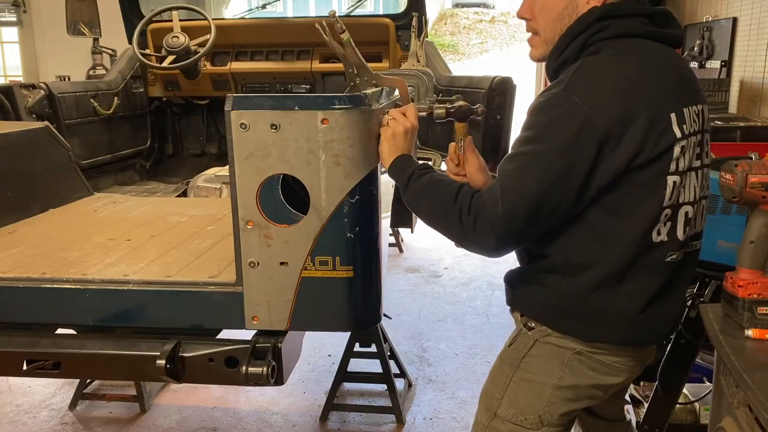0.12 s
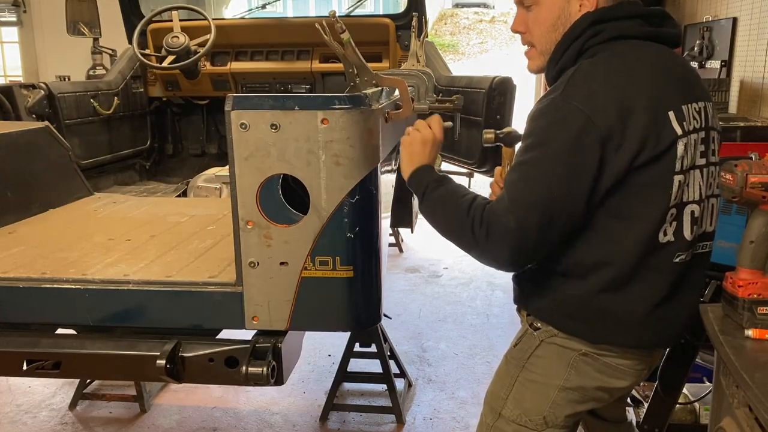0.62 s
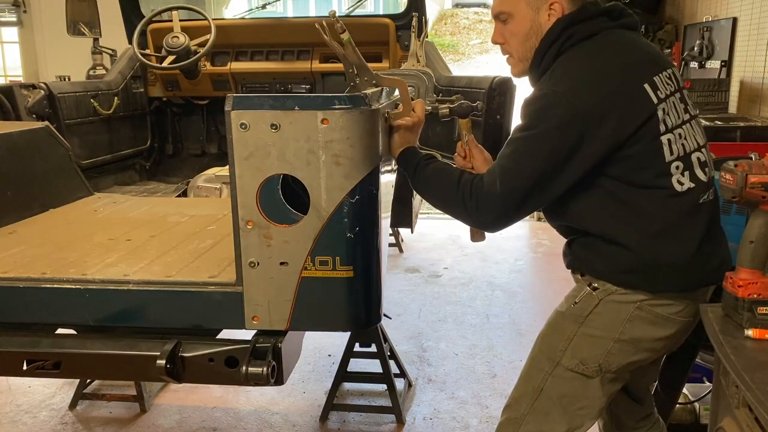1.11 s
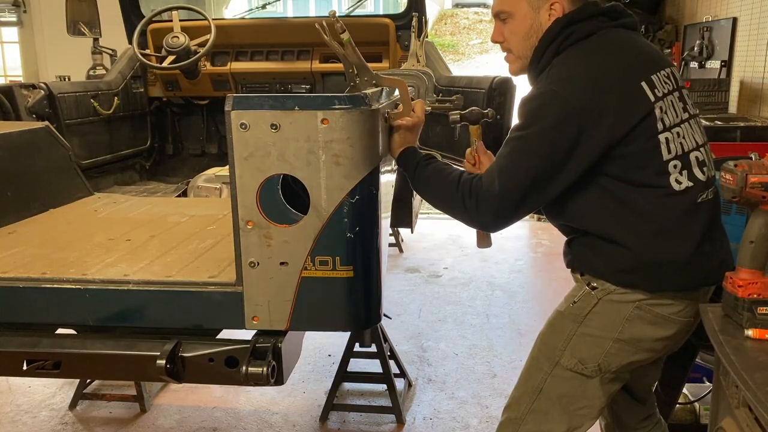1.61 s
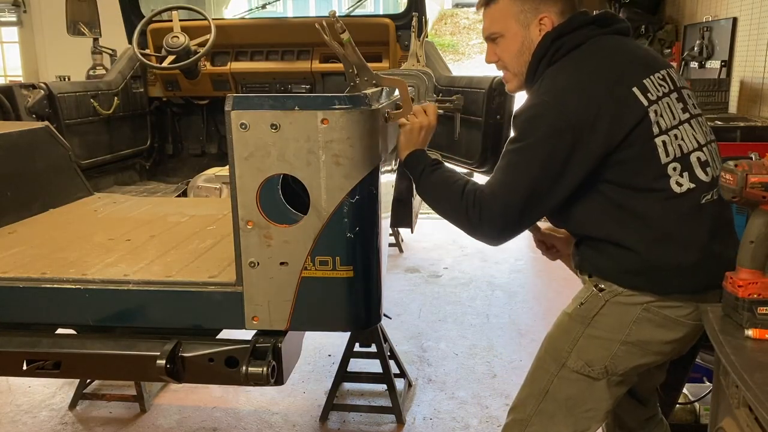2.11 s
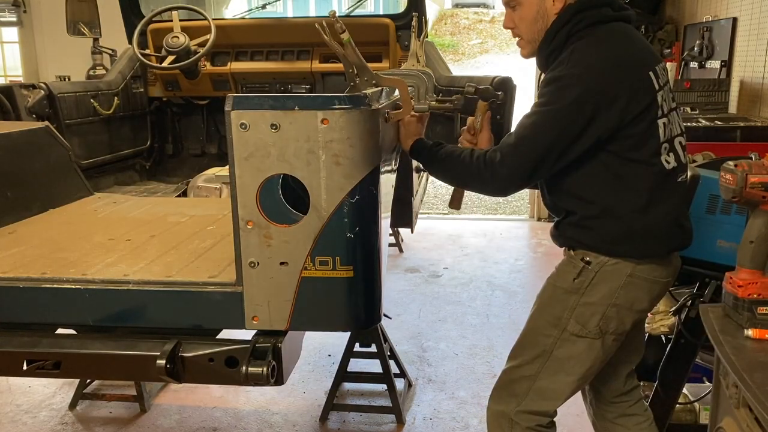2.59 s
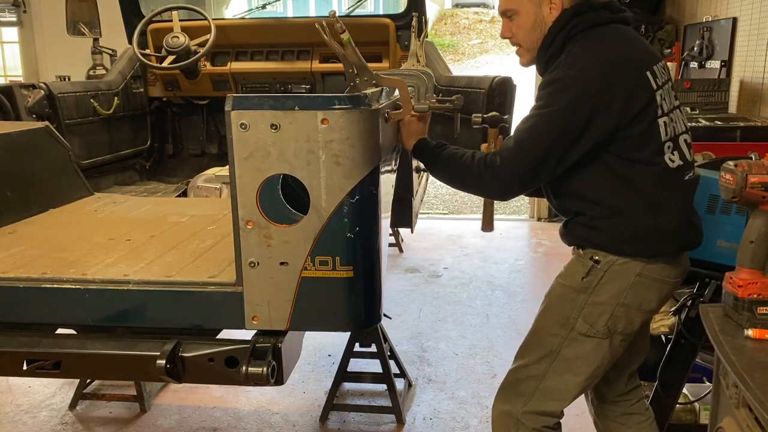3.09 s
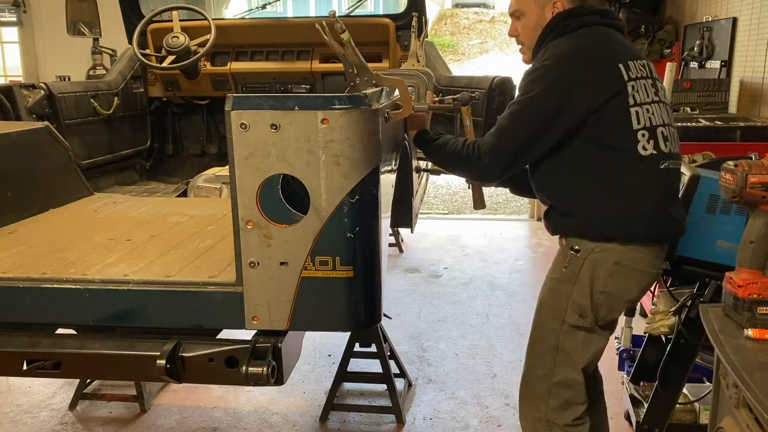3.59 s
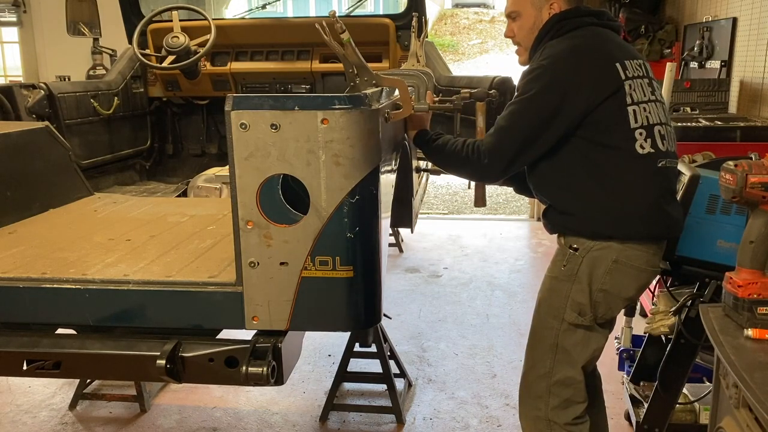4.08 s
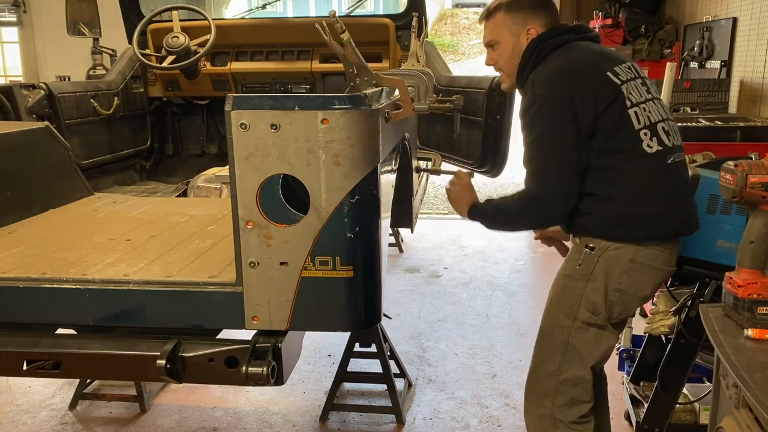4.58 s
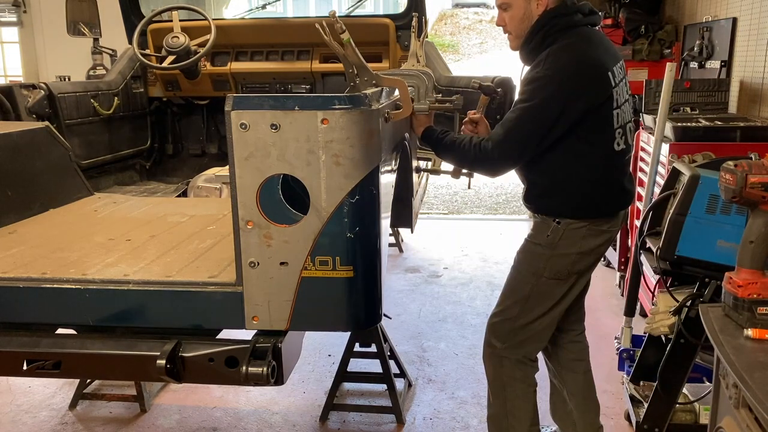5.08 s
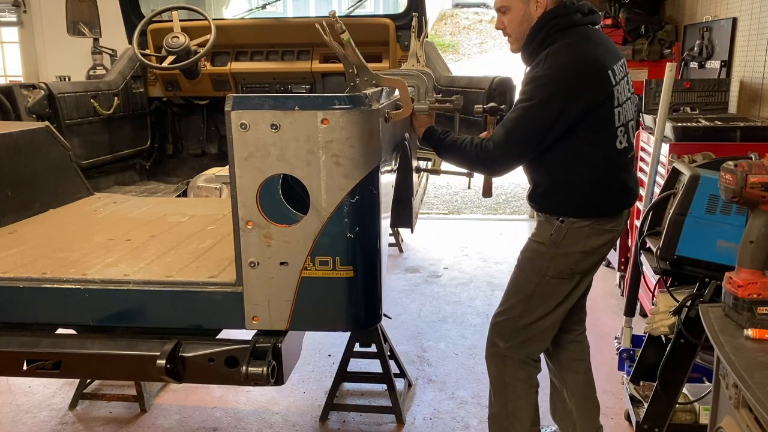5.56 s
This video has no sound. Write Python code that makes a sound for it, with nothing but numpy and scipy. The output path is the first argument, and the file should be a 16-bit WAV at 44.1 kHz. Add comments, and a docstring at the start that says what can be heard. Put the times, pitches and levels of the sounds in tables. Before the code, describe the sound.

In a hard-walled workshop, single sharp hammer strikes on sheet steel boom and clang five times, with faint metal ticks and cloth rustle between.

```python
"""Hammer and centre punch on a steel panel

Five blows in a hard-walled garage: noise-burst cracks, damped panel modes, fluttering punch lines and a
long wash of shaped noise. Jump cuts end each ring and step the background: traffic rumble, hush, scuffing
clothes as coloured noise, while the punch ticks on the steel. Two close microphone ports, gain control.
"""
import sys
import numpy as np
from scipy import signal
from scipy.fft import rfft, irfft, next_fast_len
from scipy.io import wavfile
from scipy.ndimage import uniform_filter1d, minimum_filter1d

SR = 44100
rng = np.random.default_rng(int(sys.argv[2]) if len(sys.argv) > 2 else 0)


def boost(x):
    """Linear amplitude factor 10**(x/20) for a level x in decibels (scalar or array-like)."""
    u = np.asarray(x, float) / 20
    return 10 ** u


def master_out(mix):
    """Clip the mix to full scale and print it as 16-bit PCM to the path in sys.argv[1]."""
    frames = np.transpose(np.atleast_2d(mix))
    ceiling = np.clip(frames, -1, 1)
    pcm = np.round(ceiling * 32767).astype(np.int16)
    wavfile.write(sys.argv[1], SR, pcm)


N = 250929

# Jump cuts: cut_s
CUT_TIMES_S = [.922, 2.24, 3.539, 4.81]
# Steady background between cuts: rumble_db, hush_db, scuff_db
SHOT_LEVELS = [(-49, -62.5, -79.5), (-52.5, -61, -75.5), (-50, -61, -67), (-53.5, -56.5, -67.5),
               (-55.5, -59.5, -76.5)]
# Body movements: peak_s, rise_db_per_s, fall_db_per_s, scuff_db, low_rustle_db
MOVEMENTS = [(.86, 41.5, 12.5, -56.5, -54), (2.78, 34.5, 30, -63.5, -60.5), (3.56, 100, 30, -52.5, -59),
             (4.77, 30, 17.5, -61.5, -58.5), (5.25, 71, 29.5, -63, -69.5)]
MOVE_RUMBLE_DB = 12.5  # over the low rustle
# Spectrum shape of the traffic rumble: freq_hz, relative_db_per_hz
RUMBLE_SPECTRUM = [(15, -53.5), (25, -42), (48, -1.5), (102, 0.5), (220, -9.5), (275, -15), (350, -14.5),
                   (460, -21), (770, -120)]
# Spectrum shape of the garage hush: freq_hz, relative_db_per_hz
HUSH_SPECTRUM = [(180, -26), (300, -8), (450, -6.5), (1200, -13.5), (2900, -22), (5000, -39.5),
                 (9000, -71.5), (20000, -120)]
# Spectrum shape of scuffing cloth: freq_hz, relative_db_per_hz
SCUFF_SPECTRUM = [(760, -33), (1300, -4), (1850, -5), (2300, 1), (3000, -8.5), (3890, -7), (7060, -19),
                  (12000, -35.5), (15600, -62), (22000, -120)]

# Punch tip touching the steel: start_s, level_db, ring_over_puff_db
TIP_TOUCHES = [(0.634, -48.5, -16), (0.7735, -51, -14), (1.3103, -67, -19), (1.8436, -44, -12),
               (2.0, -62, -9), (2.1053, -62, -8), (2.1468, -62, -6.5), (2.3236, -62.5, -17),
               (2.455, -60, -18), (4.3909, -40, -21)]
# Colour of the puff: freq_hz, gain_db
PUFF_COLOUR = [(1500, -16.0), (5000, 3.5), (10500, -2.5), (14000, -20.0)]
# Answer of the touched punch, strongest in two modes: freq_hz, gain_db
TOUCH_ANSWER = [(4400, -5.5), (5200, 8.5), (6000, 0.5), (9900, -6), (10400, 6.5), (12000, -8)]
# Low tones still sounding after the third cut: pitch_hz, level_db, t60_s
LINGERING_TONES = [(136.3, -39.5, 0.473), (172, -50.5, .8), (238, -51, 2.8)]

# Blows: start_s, level_db, boom_db, knock_db, clang_db, spot_along_panel (-1..1)
HAMMER_BLOWS = [(0.178, -1.5, -2, -1, -0.5, -0.78), (1.489, -0.5, -1, 4.5, -4.5, 0.35),
                (2.797, -0.5, -0.5, 1.5, -3.5, -0.44), (4.004, -2, 0, 6, 0, 0.8),
                (5.269, 0.5, 1, -0.5, -1.5, .15)]
TREBLE_DB = -5.3  # punch ring and wash top end in every blow
# Rebounds in each blow: first_s, first_level_db, gap_s, change_db_per_rebound
REBOUNDS = [(0.1773, -0.5, 0.0047, -3.7), (1.4884, 0, 0.0044, 0.7), (2.797, -1, .0021, -1.7),
            (4.0051, -1.5, .0037, 1), (5.2691, -4, .0031, -2.8)]
# Contacts in each blow: count
CONTACT_COUNTS = [4, 2, 3, 2, 4]
# Punch and hammer head modes: pitch_hz, level_db, t60_s
PUNCH_MODES = [(3170, -13, 0.9), (4250, -10.5, 0.12), (5100, -5.5, 0.77), (6070, -1.5, 0.59),
               (6920, -4.5, 0.72), (8760, 11, 0.089), (9750, -1.5, 0.33), (10450, -5.5, 0.45),
               (14900, -7.5, .15), (15670, -1.5, 0.21)]
# Panel modes: pitch_hz, t60_s, mid_panel_db, gain_from_mid_to_far_end_db
PANEL_MODES = [(67.2, 1.3, -23, -1), (122.1, 0.99, -15, 0.6), (154.8, 0.96, -21, 8),
               (187.06, 0.44, -4.5, 0.7), (216.6, 1.1, -16, 5.5), (262.3, 0.99, -17.5, -5.5),
               (341.7, 0.76, -14.5, 0.3), (375.3, 0.56, -14.5, 4), (542, 1.3, -35, 4),
               (700, 0.46, -20.5, 15)]
# Wash spectrum before each blow's tilt: freq_hz, level_db_per_hz
WASH_SPECTRUM = [(24, -55.5), (40, -16), (120, -6.5), (200, -3.5), (370, -6.5), (900, -14.5), (2200, -15),
                 (5000, -18.5), (10000, -17), (13000, -23), (14600, -28.5), (15700, -31), (16800, -76)]
# Nominal decay of the wash: freq_hz, t60_s
GARAGE_DECAY = [(60, 1.58), (160, 1.013), (420, 0.63), (1100, 0.73), (2900, 0.69), (5500, 0.59),
                (9000, 0.41), (15000, 0.37)]
# Rise of the wash: freq_hz, time_constant_s
WASH_RISE = [(60, .08), (130, .035), (200, 0.024), (400, 0.012), (600, 0.0065), (3000, 0.011)]
# First arrivals over the tail: freq_hz, level_db
EARLY_ARRIVALS = [(300, -13), (1500, -2.5), (5000, -4), (15000, 5.5)]

# Likeness of the two ports: freq_hz, correlation
PORT_LIKENESS = [(60, 0.87), (300, 0.91), (500, 0.21), (3000, 0.59), (5500, 0.15), (7000, 0.32),
                 (16000, 0.96)]
# Phase by which the left port leads: freq_hz, lead_rad
PORT_LEAD = [(0, 0), (780, .9), (5250, 1.1), (6890, 0), (8300, -3.3), (10300, -6.1), (11700, -6.4),
             (12800, -9.3), (14300, -9.6), (15200, -12.5), (16500, -12.7)]
# Level of the left port over the right: freq_hz, left_minus_right_db
PORT_LEAN = [(60, -4), (110, -2.5), (200, -4.5), (380, -1.5), (700, 1), (1290, 0.5), (2380, 1), (4400, 4),
             (8120, -1), (15000, -3)]
# Microphone top end: freq_hz, gain_db
MIC_TOP = [(15900, 0), (17300, -50)]


def unit(x):
    """Scale to rms 1."""
    return x / np.sqrt(np.mean(x ** 2) + 1e-20)


def along(points, hz):
    """Interpolate (Hz, value) points on a log frequency axis."""
    f, v = np.transpose(points)
    return np.interp(np.log(hz + 1), np.log(f + 1), v)


def filtered(x, response):
    """Multiply the spectrum of x by a complex response of frequency."""
    n = x.shape[-1]
    m = next_fast_len(n + 8192)
    return irfft(rfft(x, m) * response(np.fft.rfftfreq(m, 1 / SR)), m)[..., :n]


def coloured(spectrum):
    """Two unrelated noises of this spectrum, scaled together to rms 1."""
    return unit(filtered(rng.standard_normal((2, N)), lambda hz: boost(along(spectrum, hz))))


def place(track, s, sound):
    """Add the sound from s until the next jump cut."""
    start = round(s * SR)
    later_cuts = [round(c * SR) for c in CUT_TIMES_S if c > s]
    stop = min(later_cuts + [N, start + sound.shape[1]])
    return track + np.pad(sound[:, :stop - start], ((0, 0), (start, N - stop)))


def background():
    """Traffic rumble, garage hush and cloth noise: steady between cuts, powers added by each movement."""
    t = np.arange(N) / SR
    shot = np.searchsorted(CUT_TIMES_S, t)
    power = boost(np.transpose(SHOT_LEVELS)[:, shot]) ** 2
    for s, rise_db_per_s, fall_db_per_s, scuff_db, low_db in MOVEMENTS:
        swell_db = np.where(t < s, rise_db_per_s * (t - s), fall_db_per_s * (s - t))
        swell = boost(swell_db) * (shot == np.searchsorted(CUT_TIMES_S, s))  # confined by the cuts
        levels = boost([low_db + MOVE_RUMBLE_DB, low_db, scuff_db])
        power = power + np.outer(levels, swell) ** 2
    layers = coloured(RUMBLE_SPECTRUM), coloured(HUSH_SPECTRUM), coloured(SCUFF_SPECTRUM)
    return sum(np.sqrt(p) * layer for p, layer in zip(power, layers))


def punch(t):
    """Punch modes at new strengths each time; gripping hand and walls make each line flutter."""
    hz, db, t60 = np.transpose(PUNCH_MODES)[:, :, None]
    db = db + 2.5 * rng.standard_normal(db.shape)
    a, b = uniform_filter1d(rng.standard_normal((2, len(hz), len(t))), size=300)
    lines = unit(a * np.sin(2 * np.pi * hz * t) + b * np.cos(2 * np.pi * hz * t))
    return np.sum(boost(db - 60 * t / t60) * lines, axis=0)


def ticks():
    """Light touches: a short bright noise puff with a slower tail, and a faint punch ring."""
    track, t = np.zeros((2, N)), np.arange(SR // 2) / SR
    puff_decay = boost(-4.5 - 60 * t / 0.016) + boost(-12.5 - 60 * t / 0.33)
    for s, db, ring_db in TIP_TOUCHES:
        noise = rng.standard_normal((2, len(t)))
        puff = filtered(noise, lambda hz: 3.4 * boost(along(PUFF_COLOUR, hz))) * puff_decay
        hum = filtered(punch(t), lambda hz: boost(along(TOUCH_ANSWER, hz)))
        track = place(track, s, boost(db - 9) * (puff + boost(ring_db) * hum))
    return track


def ring(hz, db, t60, t, attack_s, blur_hz):
    """Damped modes; each is a close pair that beats, so no ring is glassy."""
    hz, db, t60 = (np.asarray(v)[:, None] for v in (hz, db, t60))
    split, phase, other = rng.random((3, len(hz), 1))
    pair = np.sin(2 * np.pi * (hz * t + phase))
    pair = pair + 0.57 * np.sin(2 * np.pi * ((hz + blur_hz * (.5 + split)) * t + other))
    return np.sum(boost(db - 60 * t / t60) * pair, axis=0) * (1 - np.exp(-t / attack_s))


def lingering():
    """Low damped tones that sound on after the third cut."""
    t = np.arange(SR // 2) / SR
    tones = ring(*np.transpose(LINGERING_TONES), t, attack_s=0.0078, blur_hz=4.2)
    return place(np.zeros((2, N)), CUT_TIMES_S[2], np.array([[1], [.6]]) * tones)


def wash(boom_db, knock_db, clang_db, treble_db):
    """Countless close panel modes and walls: noise that swells and dies at its own speed per frequency."""
    lead = 256  # samples ahead of the blow
    peaks = unit(uniform_filter1d(rng.standard_normal(SR), size=24))  # chance strengths of crowded modes
    noise = filtered(rng.standard_normal((2, SR + lead)), lambda f: boost(2.8 * peaks[f.astype(int)]))
    hz, t, z = signal.stft(unit(noise), SR, nperseg=256, noverlap=224)
    t = np.maximum(t - lead / SR, 0)
    early = boost(along(EARLY_ARRIVALS, hz)[:, None] - 60 * t / 0.13)
    t60 = along(GARAGE_DECAY, hz) * np.exp(.05 * rng.standard_normal(len(hz)))  # some modes outlast others
    beats = uniform_filter1d(rng.standard_normal(z.shape[1:]), size=3, axis=0)
    beats_db = 20 * np.log10(boost(1)) * unit(uniform_filter1d(beats, size=40))  # neighbours beat in patches
    shape = (boost(-60 * t / t60[:, None]) + early) * boost(beats_db)
    shape = shape * (1 - np.exp(-t / along(WASH_RISE, hz)[:, None]))
    tail = signal.istft(z * shape, SR, nperseg=256, noverlap=224)[1][:, :SR + lead]
    tilt = [(200, boom_db), (520, knock_db), (1500, 0.0058), (2800, 0), (5000, clang_db), (10000, treble_db)]
    tail = filtered(tail, lambda f: boost(along(WASH_SPECTRUM, f) + along(tilt, f)))[:, lead:]
    return tail * np.clip(np.arange(SR) / (0.0017 * SR), 0, 1)


def cracks():
    """Millisecond snaps of steel on steel as hammer, punch and panel meet and rebound: band-passed noise."""
    track, t = np.zeros((2, N)), np.arange(SR // 20) / SR
    centre_hz, width_hz = 3300, 5000
    band = lambda f: 1j * f * width_hz / (centre_hz ** 2 - f * f + 1j * f * width_hz)
    for (s, db, gap_s, change_db), count in zip(REBOUNDS, CONTACT_COUNTS):
        for k in range(count):
            snap = filtered(boost(-60 * t / .005) * rng.standard_normal(len(t)), band)
            sound = np.outer([1.3, .6], snap / np.abs(snap).max())
            track = place(track, s + k * gap_s, boost(db + k * change_db) * sound)
    return track


def hammer():
    """Punch ring, panel boom and wash of each blow; row 0 common to both ports, row 1 diffuse."""
    track, t = np.zeros((2, N)), np.arange(SR) / SR
    direct = np.array([[1], [.6]])
    hz, t60, mid_db, gained_db = np.transpose(PANEL_MODES)
    for s, db, boom_db, knock_db, clang_db, spot in HAMMER_BLOWS:
        steel = boost(-24 + TREBLE_DB) * punch(t)
        boom = ring(hz, mid_db + spot * gained_db, t60, t, attack_s=0.045, blur_hz=3.135)
        tail = boost(13) * wash(boom_db, knock_db, clang_db, TREBLE_DB)
        track = place(track, s, boost(db) * (direct * (steel + boom) + tail))
    return track


def scene():
    """Mix all layers, then split common and diffuse sound over two ports by likeness, lead and lean."""
    common, diffuse = background() + ticks() + lingering() + cracks() + hammer()
    turn = lambda hz: np.arccos(np.clip(along(PORT_LIKENESS, hz), -1, 1)) / 2
    shared = filtered(common, lambda hz: np.cos(turn(hz)))
    apart = filtered(diffuse, lambda hz: np.sin(turn(hz)))
    side = np.array([[.5], [-.5]])
    phase = lambda hz: np.exp(1j * side * np.interp(hz, *np.transpose(PORT_LEAD)))
    lead = lambda hz: phase(hz) * boost(side * along(PORT_LEAN, hz))
    return filtered(np.array([shared + apart, shared - apart]), lead)


def top_cut(x):
    """Nothing passes above the cut-off."""
    return signal.sosfilt(signal.butter(12, 16970, fs=SR, output="sos"), x)


def record(dry):
    """Gain control lags, holds, then lets go as the ring fades; peaks clip softly, the top end rolls off."""
    threshold_db, slope, hold_s, smooth_s, lag_s = -31.5, .3, .16, .016, .016
    power = uniform_filter1d(np.mean(dry ** 2, axis=0), round(.024 * SR))
    level_db = 10 * np.log10(np.abs(power) + 1e-12)
    need_db = -slope * np.maximum(level_db - threshold_db, 0)
    hold = round(hold_s * SR)
    held_db = minimum_filter1d(np.pad(need_db, (hold, 0)), hold)[hold // 2:][:N]  # past samples only
    smooth_db = uniform_filter1d(held_db, round(smooth_s * SR))
    gain_db = np.pad(smooth_db, (round(lag_s * SR), 0))[:N]
    x = dry * boost(gain_db)
    x = x / (1 + np.abs(x / .95) ** 4) ** (1 / 4)  # soft ceiling .95
    x = filtered(x, lambda hz: boost(along(MIC_TOP, hz)))
    return top_cut(x)


dry = scene()
out = record(dry)
master_out(out)
```